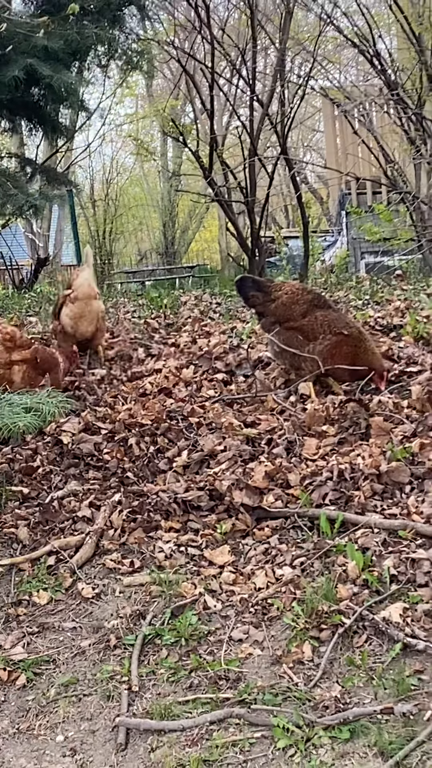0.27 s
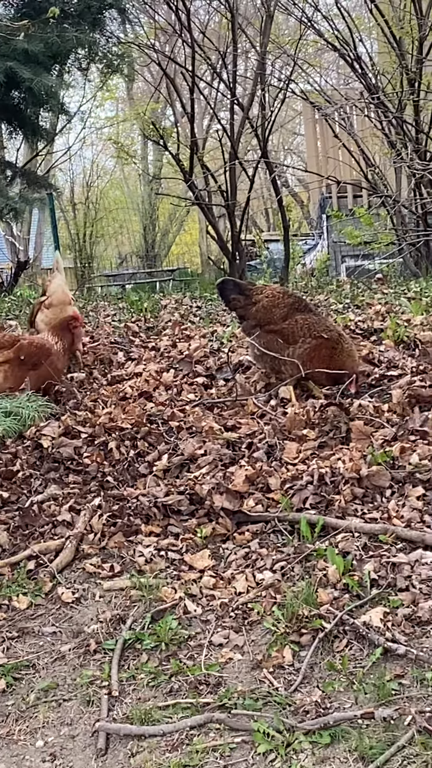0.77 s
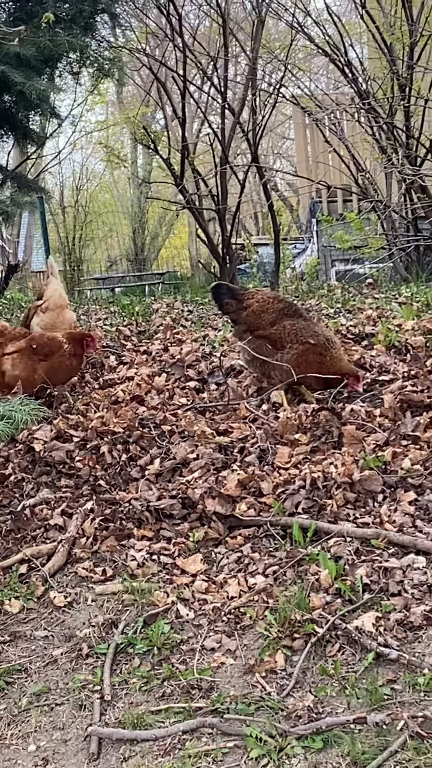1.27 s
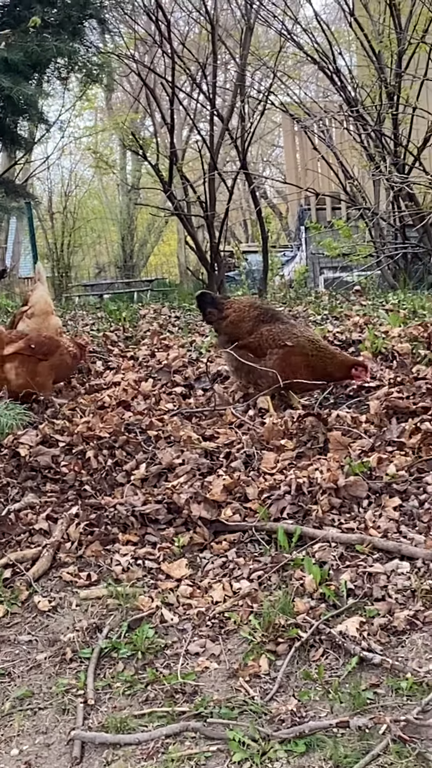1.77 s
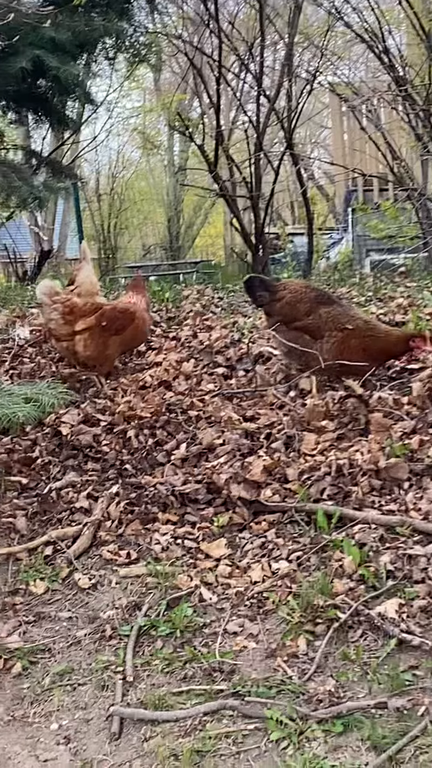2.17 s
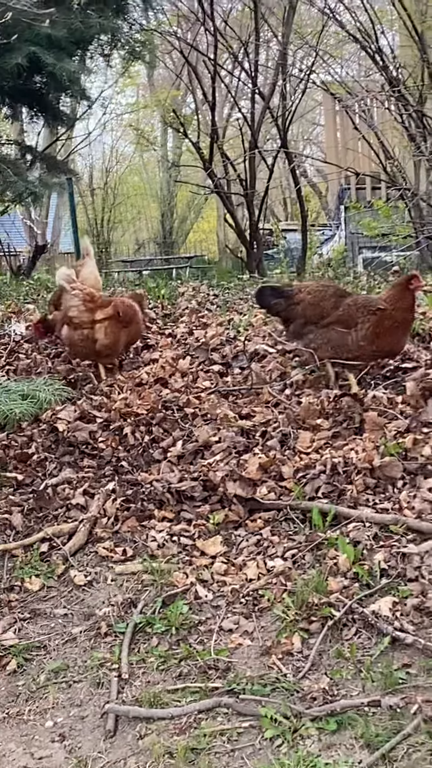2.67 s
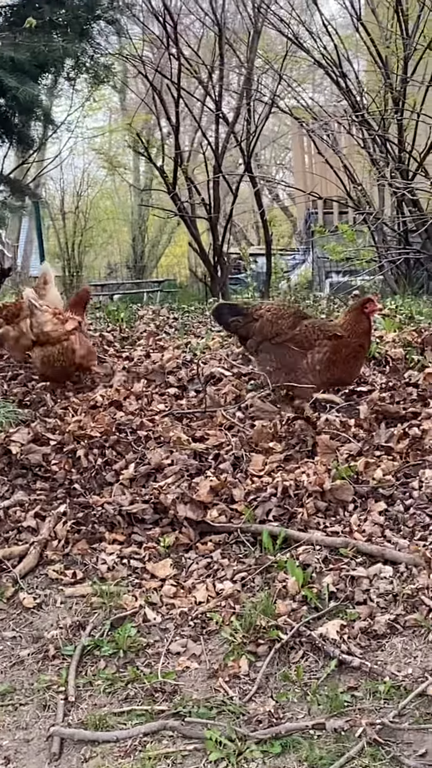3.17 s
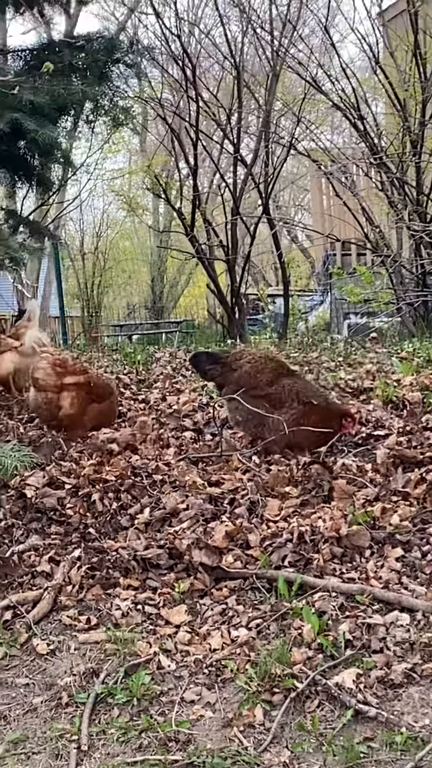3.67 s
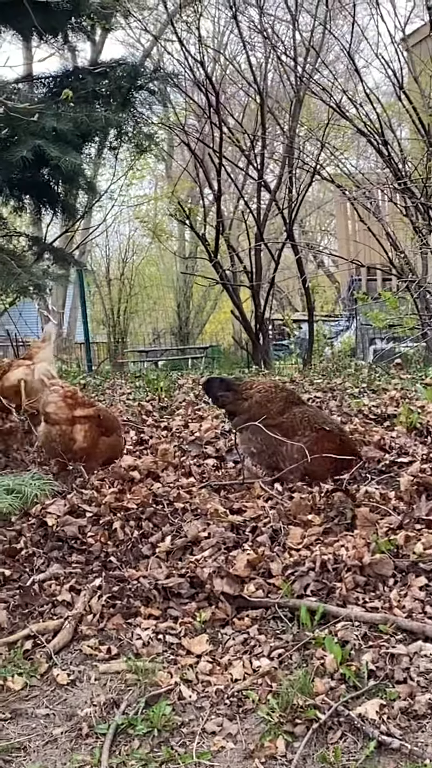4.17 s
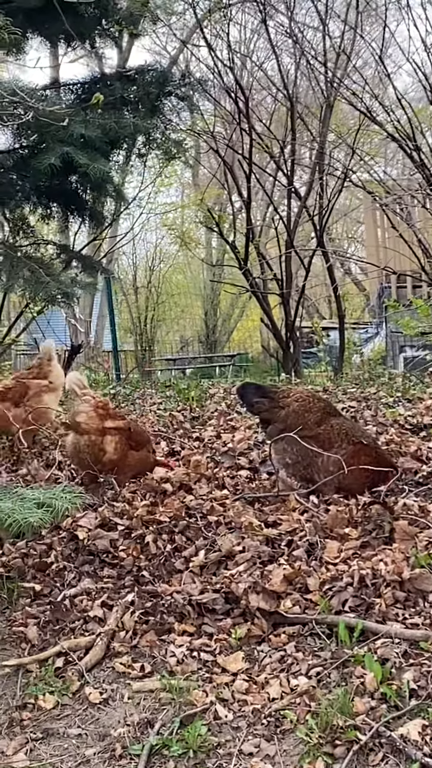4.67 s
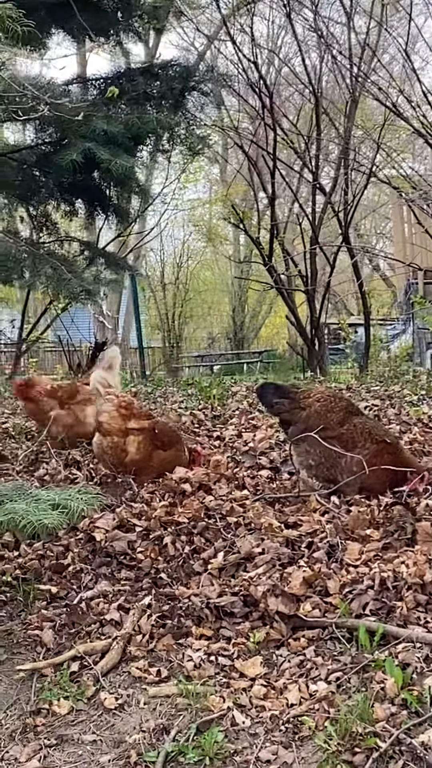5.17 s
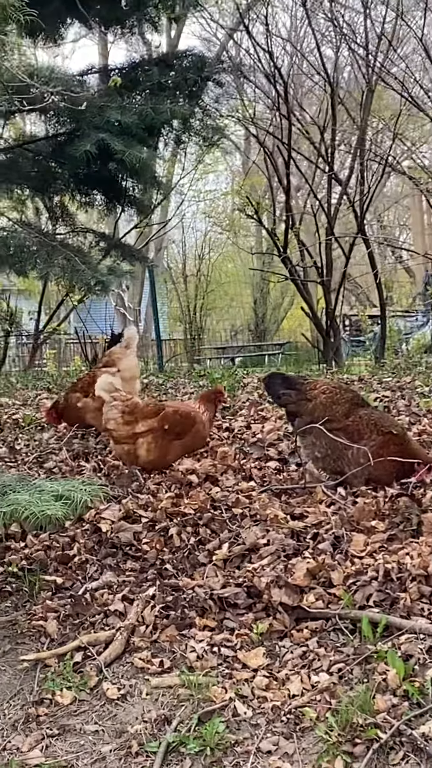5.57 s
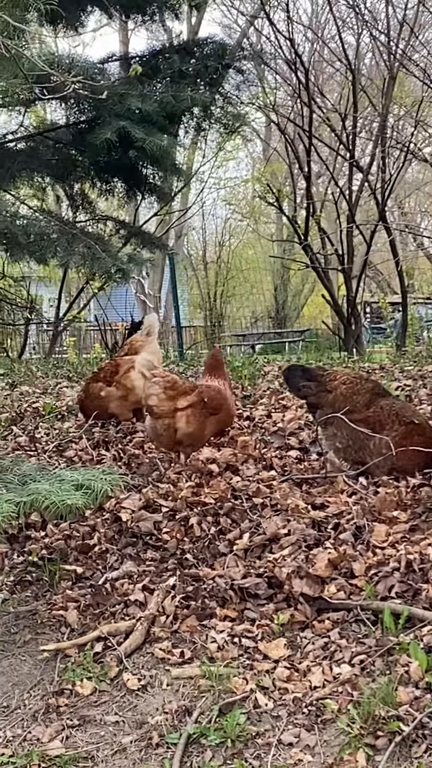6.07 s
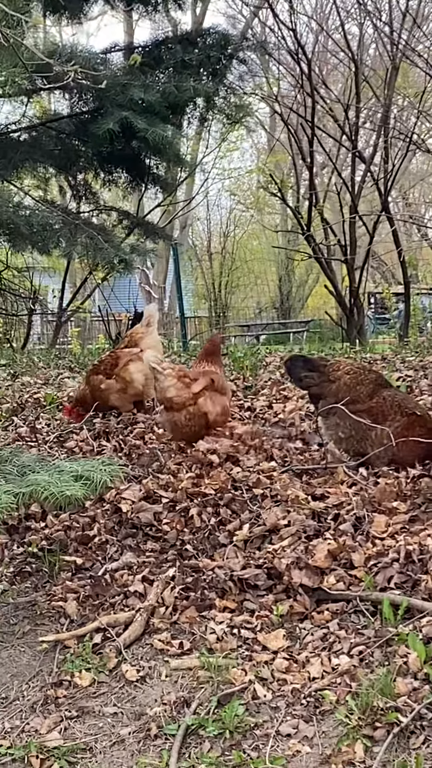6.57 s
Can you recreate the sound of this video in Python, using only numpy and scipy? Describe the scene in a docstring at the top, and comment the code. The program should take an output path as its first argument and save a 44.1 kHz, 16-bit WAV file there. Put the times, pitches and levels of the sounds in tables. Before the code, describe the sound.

Crisp leaf rustling and small snapping cracks from scratching chickens outdoors, with a faint engine drone swelling and a car nearing at the end.

```python
"""Hens rake through dry fallen leaves: each stroke is a swarm of tiny fractures over sliding hiss.
Pecks and snapping stalks add single cracks, made of noise that dies within milliseconds.
Distant traffic and open air, as coloured noise, lie underneath; an engine's drone swells and ebbs.
Tyre noise rises near the end by a law of distance.
Phase and likeness that vary with frequency give the stereo width."""
import sys
import numpy as np
from scipy import signal
from scipy.fft import rfft, irfft
from scipy.io import wavfile
from scipy.ndimage import uniform_filter1d

SR = 44100
rng = np.random.default_rng(int(sys.argv[2]) if len(sys.argv) > 2 else 0)


def to_wav(s):
    """Save 16-bit WAV."""
    ch = np.atleast_2d(s).T  # columns
    pcm = np.round(np.clip(ch, -1, 1) * 32767)  # PCM
    wavfile.write(sys.argv[1], SR, pcm.astype(np.int16))


N = 300982
TIME, HZ = np.arange(N) / SR, np.fft.rfftfreq(N, 1 / SR)  # s, Hz

# colour of dry leaves, for rustle and snaps: [f/Hz, relative density/dB per Hz]
LEAF_SPECTRUM = [(150, -32), (380, 1.5), (780, 1), (1250, -6), (1650, -1), (2100, -2.5), (2450, 2),
                 (3400, -1), (5400, 1), (6500, -2.5), (7600, -2), (8800, -1), (10200, -4), (13000, -5),
                 (15800, -7.5)]


def gain_of(db):
    """Logarithmic level: decibels to an amplitude ratio."""
    return 10 ** (np.asarray(db) / 20)


def evened(x):
    """Power normalisation: scales to rms 1."""
    return x / np.sqrt(np.mean(x ** 2) + 1e-20)


def curve(rows, at):
    """Linear interpolation: the points of a table joined by straight lines."""
    rows = np.asarray(rows, float)
    return np.interp(at, rows[:, 0], rows[:, 1])


def colour(x, points):
    """Linear filtering: multiplies the spectrum by a curve drawn on a log-frequency axis."""
    hz, db = np.transpose(points)
    response_db = np.interp(np.log(HZ + 1), np.log(hz), db)
    return irfft(rfft(x) * gain_of(response_db), N)


def band(x, lo_hz, hi_hz):
    """Band-pass filtering: the difference of two soft low-pass responses."""
    below_hi = 1 / (1 + (HZ / hi_hz) ** 6)
    below_lo = 1 / (1 + (HZ / lo_hz) ** 6)
    return irfft(rfft(x) * (below_hi - below_lo), N)


def evened_middle(x):
    """Band-level normalisation: scales the middle band to a standard deviation of 1."""
    return x / np.std(band(x, 2300, 5500))


def wander(rate_hz):
    """Low-pass random process: slow chance of rms 1."""
    return evened(irfft(rfft(rng.standard_normal(N)) / (1 + (HZ / rate_hz) ** 4), N))


def raking():
    """Envelope superposition: strokes add in power; the strongest leads crunch and crispness, in dB."""
    # strokes of a foot: [start t/s, length/s, relative strength/dB,
    # crunch of deep heavy leaves/dB, crispness of thin top leaves/dB]
    strokes = [(-.06, 0.13, -65, -8, 5), (0.059, .12, -57, -8, 2.5), (0.317, .06, -67, -1.5, 0),
               (0.429, .07, -72, 1, -6), (0.589, 0.15, -71, 4, 3), (0.779, 0.048, -70, 7, 1.5),
               (.97, .15, -75, 9, -7), (1.17, .09, -70.5, 6, -1.5), (1.36, .19, -67, 2.5, -2.5),
               (1.621, 0.092, -65, 0, 4), (1.8, .12, -65.5, -3, -2.5), (2.089, .21, -64, -1.5, 3),
               (2.339, .12, -64, -3, 0), (2.55, 0.099, -73, -3, -1), (2.79, .14, -59.5, -4, 1.5),
               (2.95, .1, -53, -0.5, -1), (3.07, 0.089, -52, 0, -2.5), (3.14, 0.077, -50.5, -2, -1.5),
               (3.301, .05, -53, -1, -0.5), (3.38, .12, -51, -0.5, -3.5), (3.559, .19, -55, 1, -2),
               (3.831, .11, -53, -2.5, -2), (3.91, .17, -46.5, -5, -0.5), (4.249, .2, -58, -2, -1),
               (4.441, .13, -54.5, -2.5, -0.5), (4.75, 0.13, -52.5, -3.5, 1.5), (4.99, .14, -57, -2, 0.5),
               (5.182, 0.089, -49, -4, -1.5), (5.26, .08, -54, -4, 3), (5.559, .16, -68, 4, 5.5),
               (5.859, 0.26, -72, 2, -6), (6.091, 0.2, -62, 1, -4), (6.291, .06, -60, 5, 1),
               (6.36, .11, -49.5, 0, -3), (6.621, .11, -53, 2.5, -3.5), (6.729, .09, -49.5, -0.5, -4.5)]
    # between strokes the hens' weight still stirs the litter
    stir_db, stir_crunch_db, stir_crisp_db = -78, -3, -2
    dig_s, settle_db_per_s = .069, 87  # the claws dig in; once the foot lifts, the leaves settle
    catch_db, catch_hz = 0.79, 30  # claws catch and slip
    power = np.full(N, gain_of(2 * stir_db))
    tone = np.outer([stir_crunch_db, stir_crisp_db], power)
    for start, length, db, crunch_db, crisp_db in strokes:
        t = TIME - start
        dig = np.clip(t / dig_s, 0, 1)
        settle = gain_of(db - settle_db_per_s * np.maximum(t - length, 0))
        stroke = (dig * settle) ** 2
        power = power + stroke
        tone = tone + np.outer([crunch_db, crisp_db], stroke)
    strength_db = 10 * np.log10(power) + catch_db * wander(catch_hz)
    return strength_db, *(tone / power)


def fractures(per_s, spread_db, cycles, clump_db, count=24):
    """Impulse excitation of resonators: leaves of many sizes crack in bursts and ring a cycle or two."""
    t, out = np.arange(256) / SR, np.zeros(N)
    for hz in np.geomspace(900, 15000, count):
        at = np.flatnonzero(rng.random(N) < per_s / count / SR)
        bursts = np.interp(at, np.linspace(0, N, 280), rng.standard_normal(280))
        size_db = spread_db * np.minimum(rng.exponential(1, len(at)), 4) + clump_db * bursts
        clicks = np.zeros(N)
        # dividing by the root of the rate keeps the mean power steady
        clicks[at] = rng.choice([-1, 1], len(at)) * gain_of(size_db) / np.sqrt(per_s[at])
        ring = np.exp(-t * hz / cycles) * np.cos(2 * np.pi * hz * t)
        out += np.convolve(clicks, ring)[:N] * hz  # small leaves ring briefly but sharply
    return evened_middle(out)


def splits(per_s, spread_db):
    """Broadband impulse: now and then a vein splits with a click that spans all pitches."""
    size = gain_of(spread_db * np.minimum(rng.exponential(1, N), 3))
    sign = rng.choice([-1, 1], N)
    happens = rng.random(N) < per_s / SR
    return evened(size * sign * happens / np.sqrt(per_s))


def patches(x, patchy_db, order=512):
    """Time-varying filtering: each curled leaf colours the sound for the moment that it moves."""
    overlap = order * 3 // 4
    z = signal.stft(x, nperseg=order, noverlap=overlap)[2]
    across_hz = uniform_filter1d(rng.standard_normal(z.shape), size=2, axis=0)
    field = uniform_filter1d(across_hz, size=9, axis=1)  # holds for a few hundredths of a second
    return signal.istft(z * gain_of(patchy_db * evened(field)), nperseg=order, noverlap=overlap)[1][:N]


def scatter(x, t60, wet_db):
    """Diffuse scattering by leaves and ground: a head-on and a diffuse copy, each with a random tail."""
    frame, hop = 128, 32  # samples
    direct = signal.stft(x, nperseg=frame, noverlap=frame - hop)[2]
    shape = (3,) + direct.shape
    chance = rng.standard_normal(shape) + 1j * rng.standard_normal(shape)
    keep = gain_of(-120 * hop / SR / t60)  # power kept per hop: 60 dB lost in t60 seconds
    power = abs(direct) ** 2
    tail = gain_of(wet_db) * np.sqrt(signal.lfilter([0, 1 - keep], [1, -keep], power))
    # overlapping random frames partly cancel, hence the root of two
    pair = np.array([direct, np.sqrt(2 * power) * chance[2]])
    pair = pair + np.sqrt(2) * tail * chance[:2]
    heard = signal.istft(pair, nperseg=frame, noverlap=frame - hop)[1][:, :N]
    return heard / np.sqrt(1 + gain_of(2 * wet_db))


def hens(rustle_db=-2.5, slide_db=-1.0, split_db=-8, flutter_db=0.33):
    """Friction and fracture: harder strokes break more leaves, while sliding blades add hiss."""
    strength_db, crunch_db, crisp_db = raking()
    per_s = 6000 * gain_of(.8 * (strength_db + 55))
    slide = evened_middle(rng.standard_normal(N))
    crackle = fractures(per_s, spread_db=3.0, cycles=1.3, clump_db=1.5)
    crackle += gain_of(split_db) * splits(0.045 * per_s, spread_db=-0.5)
    coloured = colour(crackle + gain_of(slide_db) * slide, LEAF_SPECTRUM)
    leaves = patches(coloured, patchy_db=2.0) * gain_of(flutter_db * wander(49))
    leaves = evened_middle(leaves)
    low, high = band(leaves, 1, 2500), band(leaves, 7000, 40000)
    leaves += low * (gain_of(crunch_db) - 1) + high * (gain_of(crisp_db) - 1)
    leaves *= gain_of(strength_db + rustle_db)
    return scatter(leaves, t60=.04, wet_db=-8)


def distant(spectrum, level_db):
    """Random noise of a given spectral density: far-off sound, head-on and diffuse."""
    return evened(colour(rng.standard_normal((2, N)), spectrum)) * gain_of(level_db)


def open_air():
    """Stationary noise: the steady murmur of open air."""
    # colour of the air: [f/Hz, relative density/dB per Hz]
    air_spectrum = [(100, -9), (300, 4.5), (450, -1), (650, 2), (830, 2.5), (1200, -3), (1600, -4.5),
                    (2300, -12), (4000, -43), (8000, -19.5), (16000, -24)]
    return distant(air_spectrum, -65.0)


def far_traffic():
    """Amplitude-modulated noise: a low rumble whose level drifts."""
    # colour of the rumble: [f/Hz, relative density/dB per Hz]
    rumble_spectrum = [(15, -33), (28, -24), (40, -3.5), (58, -3), (82, 1.5), (105, -2.5), (140, -10),
                       (200, -12), (290, -21), (450, -27.5), (1000, -65)]
    # course of the rumble: [t/s, level/dB]
    rumble_level = [(0, -52), (.6, -51), (1.2, -47), (1.6, -50.5), (2.4, -48.5), (3.2, -52.5), (5.3, -46),
                    (6.2, -49.5), (6.8, -49)]
    return distant(rumble_spectrum, curve(rumble_level, TIME))


def engine_drone():
    """Power addition of envelopes: narrow-band noise swells in bell shapes over a faint idle."""
    # colour of the drone: [f/Hz, relative density/dB per Hz]
    drone_spectrum = [(100, -48), (150, -7.5), (165, -8), (176, 1.5), (188, -7), (208, -5), (230, -18),
                      (255, -14), (285, -39), (500, -49)]
    # swells of the drone: [crest t/s, half width/s, level/dB]
    drone_swells = [(0, 0.18, -60.5), (2.15, .4, -54.5), (4.55, .9, -54.5), (5.08, .26, -46),
                    (6.3, 0.59, -54.5)]
    power = gain_of(2 * -72)  # idle, -72 dB
    for crest, width, db in drone_swells:
        power = power + gain_of(2 * db) * np.exp(-((TIME - crest) / width) ** 2)
    return distant(drone_spectrum, 10 * np.log10(power))


def ticks():
    """Uniform random events: light pecks at chance moments, in rows like the snaps."""
    ticks_per_s, tick_db, spread_db = 7, -67, 2
    treble_db, treble_spread_db = -7, 5
    count = round(ticks_per_s * N / SR)
    when, size, thin = rng.random((200, 3))[:count].T
    starts = when * TIME[-2048]  # leaves room for the last crack
    levels_db = tick_db + spread_db * (2 * size - 1)
    trebles_db = treble_db + treble_spread_db * (2 * thin - 1)
    return list(zip(starts, levels_db, trebles_db))


def snaps(snap_db=3, crack_t60=0.014, rise_s=0.00024):
    """Transient excitation: noise with a sharp rise and exponential decay; thin leaves crack brighter."""
    # pecks and snapping stalks: [t/s, relative level/dB, treble against the middle/dB]
    snap_rows = [(0.1536, -44, 16), (0.5163, -63, -20), (0.6585, -59, 12), (0.739, -58.5, -4),
                 (1.422, -60.5, -11), (1.6823, -52.5, 3), (1.8223, -54, 2), (2.001, -59, 9),
                 (2.1565, -55.5, 0), (2.2375, -45, 10), (2.445, -54, 4), (2.9258, -48, 8), (2.982, -50, 9),
                 (3.0067, -51.5, -13), (3.6295, -48, 2), (4.185, -49.5, 0), (4.4824, -44.5, -1.5),
                 (5.0865, -56, -4), (6.3171, -50.5, -5)]
    t, out = np.arange(2048) / SR, np.zeros(N)
    treble = np.interp(np.fft.rfftfreq(len(t), 1 / SR), [4000, 11000], [0, 1])
    envelope = gain_of(-60 * t / crack_t60) * (1 - np.exp(-t / rise_s))
    for s, db, treble_db in snap_rows + ticks():
        crack = rng.standard_normal(len(t)) * envelope
        snap = irfft(rfft(crack) * gain_of(treble_db * treble))
        start = round(s * SR)
        # scaled by its first 4 ms
        out[start:start + len(t)] += gain_of(db + snap_db) * snap / np.std(snap[:176])
    return scatter(patches(colour(out, LEAF_SPECTRUM), patchy_db=5.0), t60=0.069, wet_db=-2.5)


def passing_car():
    """Attenuation with distance: tyre noise grows as a car nears along a straight road."""
    # colour of the tyre noise: [f/Hz, relative density/dB per Hz]
    tyre_spectrum = [(100, -10.5), (260, 1.5), (330, -0.5), (420, -1), (550, 0.5), (660, -1.5), (780, 1),
                     (1000, -4.5), (1300, -7.5), (1600, -13.5), (2200, -15), (4000, -36), (10000, -57)]
    nearest_db, nearest_s, fall_db_per_decade = -51, 6.64, 28
    pass_s = 0.44  # nearest distance over speed
    distance = np.hypot(1, (TIME - nearest_s) / pass_s)  # in nearest distances
    return distant(tyre_spectrum, nearest_db - fall_db_per_decade * np.log10(distance))


def stereo(pair, diffuse_share=1):
    """Interchannel phase and coherence: left and right are nearly alike, the treble turned in phase."""
    # phase between left and right: [f/Hz, lead of the left/rad]
    stereo_phase = [(0, 0), (250, 0), (520, -.4), (800, -.1), (1100, -.4), (1500, 0), (2100, 0), (2500, .4),
                    (2900, 0), (4000, 0), (4400, .5), (4800, .1), (5200, .1), (6100, 1.4), (7000, np.pi),
                    (7900, np.pi), (8900, 4.8), (9700, 2 * np.pi), (11200, 2 * np.pi), (12200, 8),
                    (13000, 3 * np.pi), (14400, 3 * np.pi), (15800, 12.4)]
    # likeness of left and right at a diffuse share of 1: [f/Hz, likeness from 0 to 1]
    stereo_likeness = [(0, 1), (130, 1), (230, .99), (560, .74), (1100, .86), (1500, 1), (2100, 1),
                       (2500, .92), (3000, 1), (3900, 1), (4400, .88), (4800, .99), (5300, .88),
                       (6300, .78), (7000, 1), (7700, 1), (8300, .82), (9300, .79), (9800, 1), (11000, 1),
                       (11800, .76), (12500, .8), (13100, 1), (14300, 1), (14800, .62), (16000, .7)]
    unlike = np.clip(diffuse_share * (1 - curve(stereo_likeness, HZ)) / 2, 0, 1)
    direct, diffuse = rfft(pair) * np.sqrt([1 - unlike, unlike])
    turn = np.exp(.5j * curve(stereo_phase, HZ))  # half the phase on each side
    return irfft(np.array([(direct + diffuse) * turn, (direct - diffuse) / turn]), N)


def scene():
    """Linear superposition: hens and yard share one stereo width, the car is less diffuse."""
    yard = open_air() + far_traffic() + engine_drone()
    return stereo(hens() + snaps() + yard) + stereo(passing_car(), diffuse_share=0.11)


def record(dry):
    """Band limitation: a linear-phase low-pass removes the highest treble."""
    edge_hz = 15850
    low_pass = signal.firwin(1023, edge_hz, window=("kaiser", 9), fs=SR)
    return signal.oaconvolve(dry, low_pass[None], "same")


dry = scene()
out = record(dry)
to_wav(out)
```